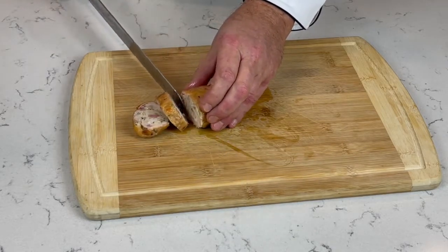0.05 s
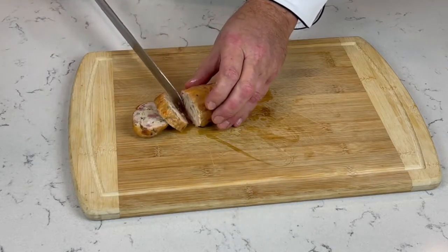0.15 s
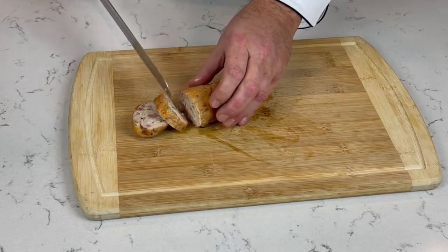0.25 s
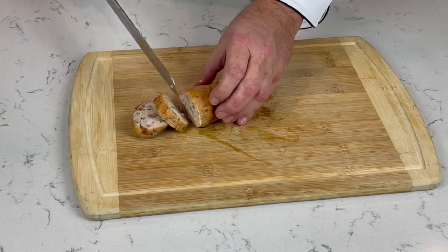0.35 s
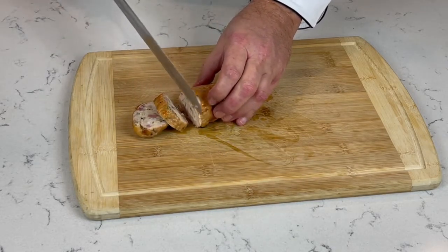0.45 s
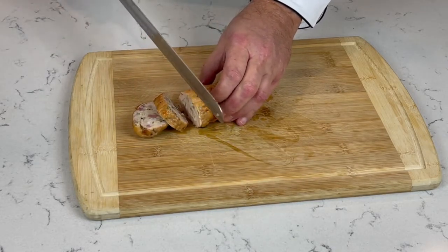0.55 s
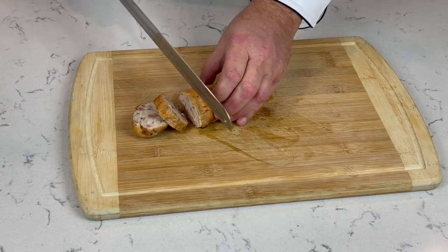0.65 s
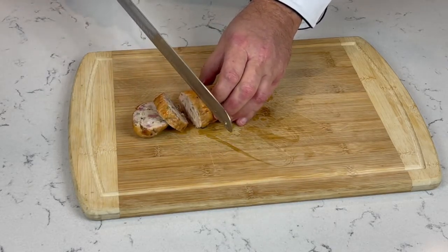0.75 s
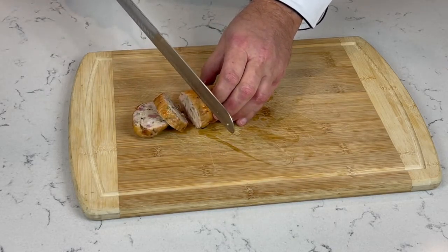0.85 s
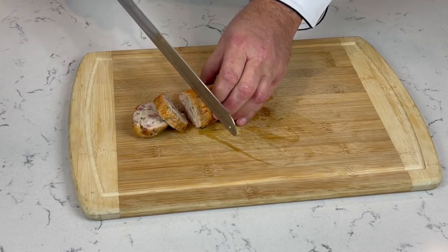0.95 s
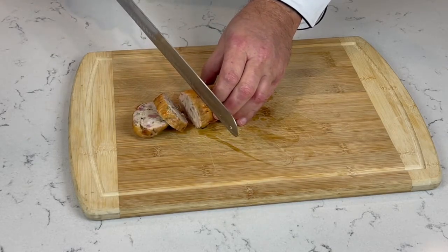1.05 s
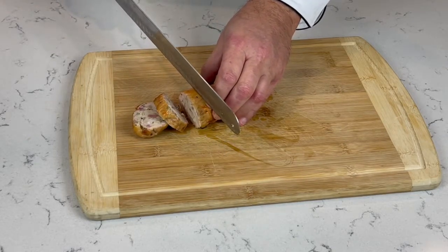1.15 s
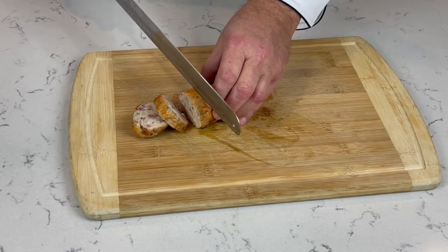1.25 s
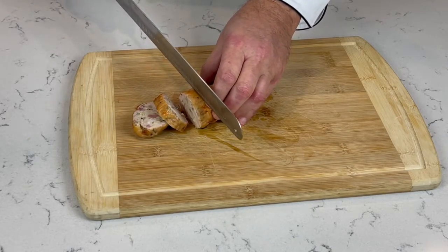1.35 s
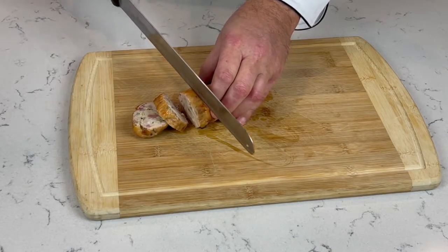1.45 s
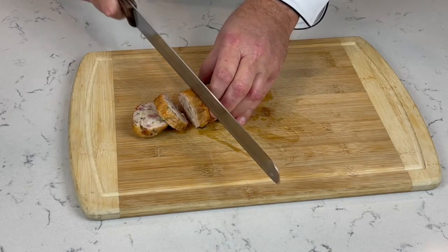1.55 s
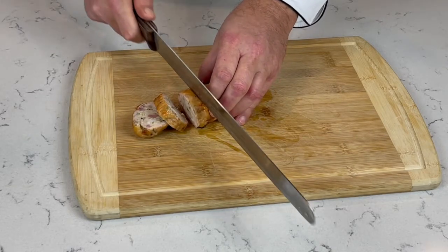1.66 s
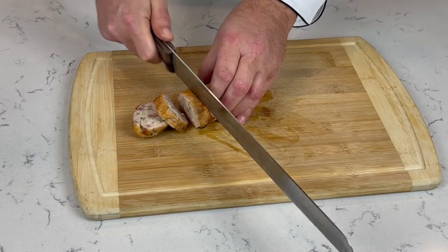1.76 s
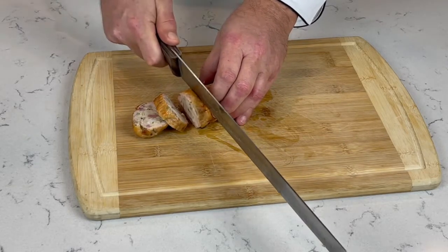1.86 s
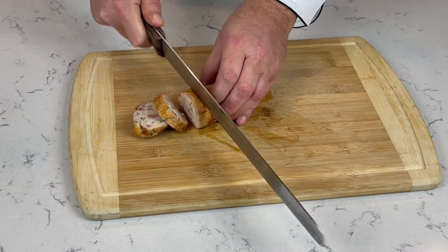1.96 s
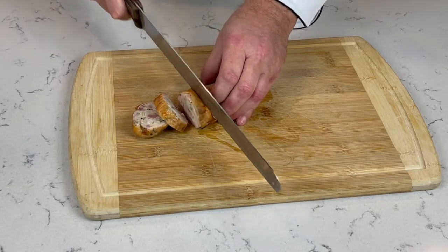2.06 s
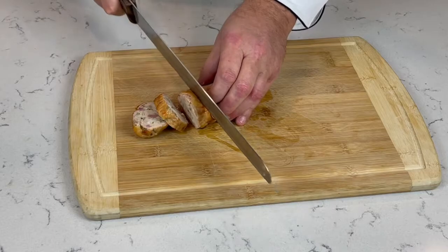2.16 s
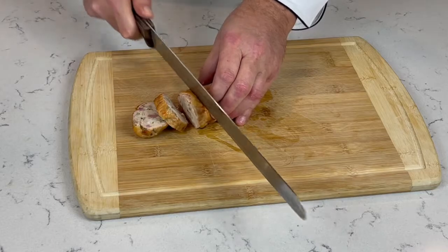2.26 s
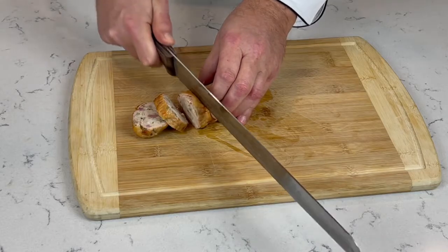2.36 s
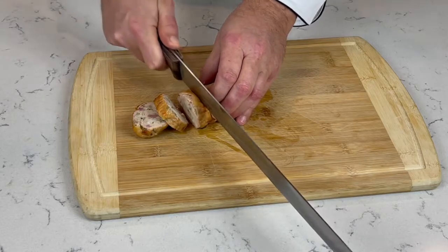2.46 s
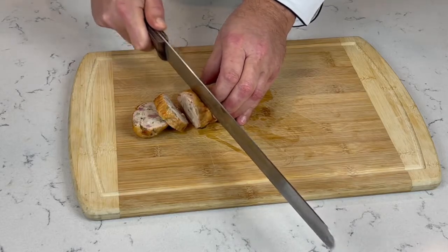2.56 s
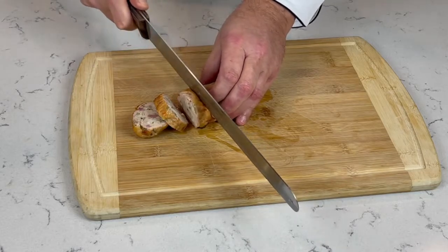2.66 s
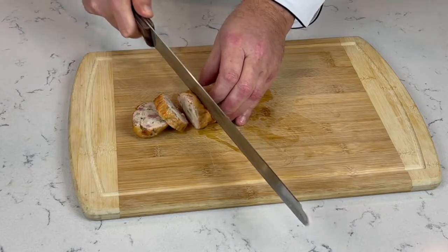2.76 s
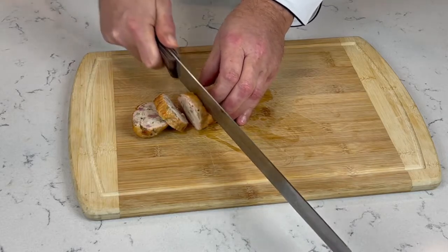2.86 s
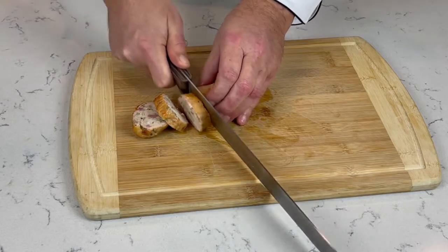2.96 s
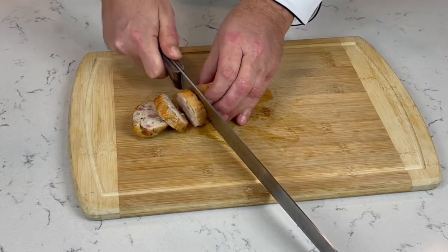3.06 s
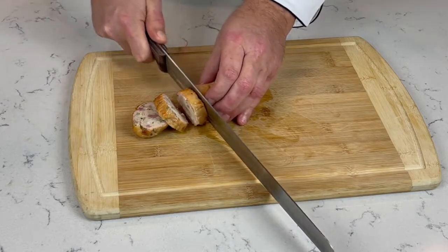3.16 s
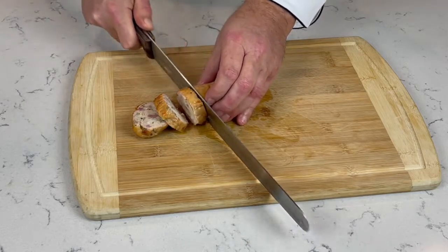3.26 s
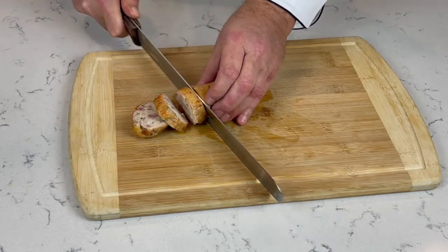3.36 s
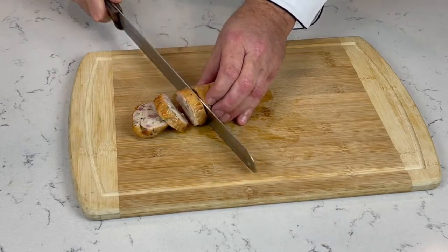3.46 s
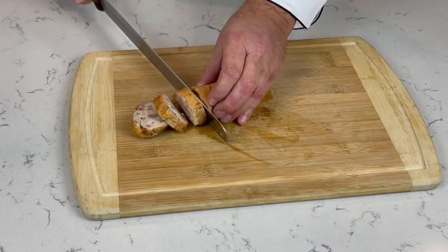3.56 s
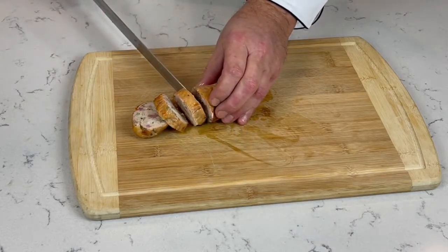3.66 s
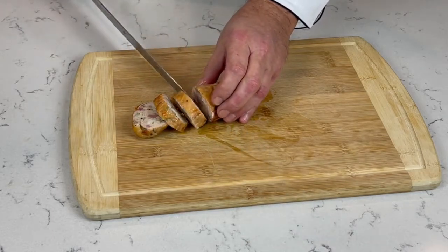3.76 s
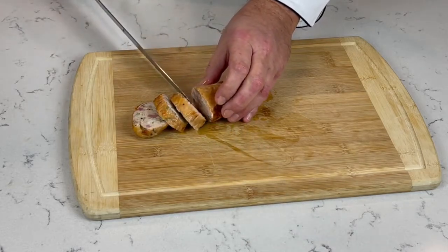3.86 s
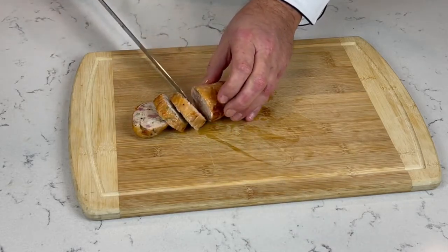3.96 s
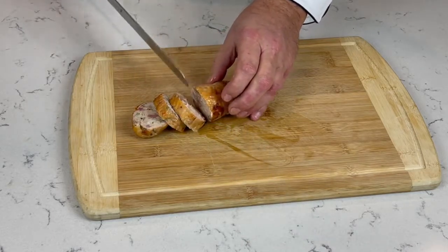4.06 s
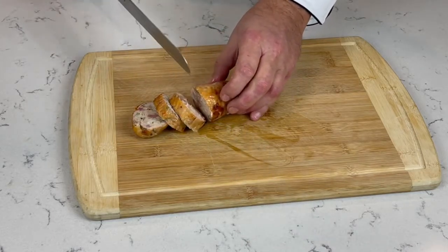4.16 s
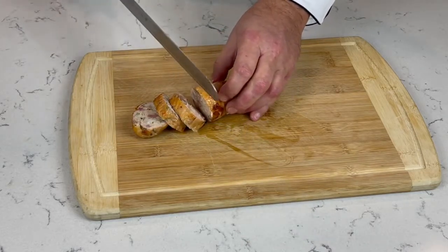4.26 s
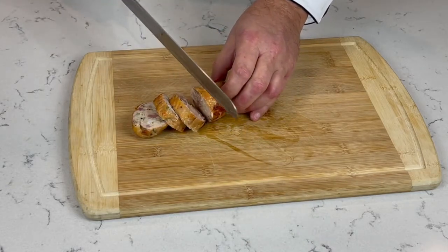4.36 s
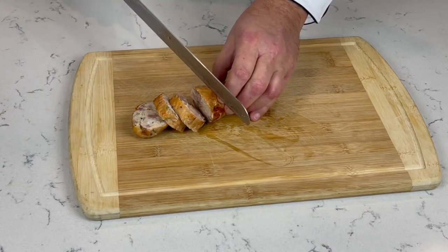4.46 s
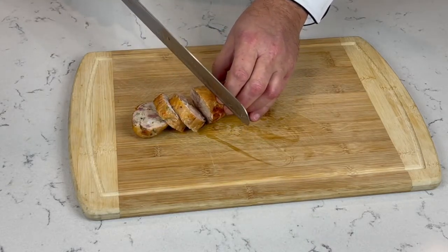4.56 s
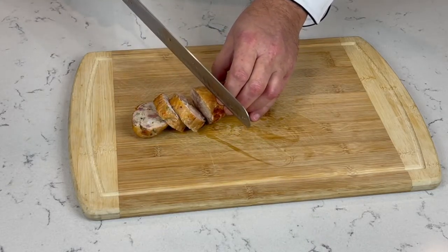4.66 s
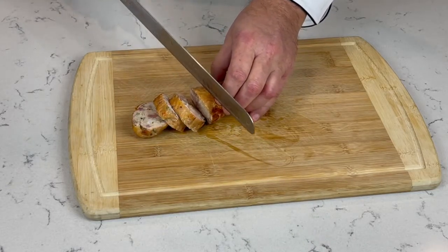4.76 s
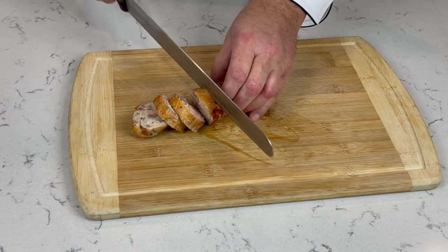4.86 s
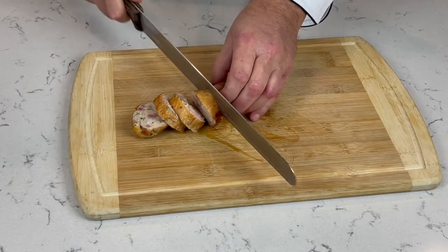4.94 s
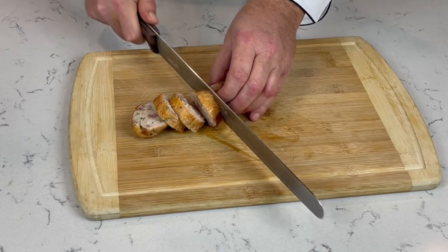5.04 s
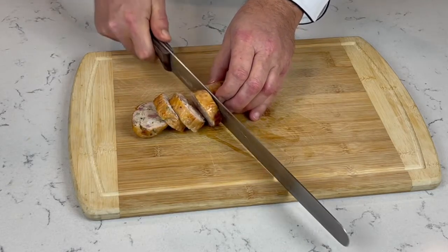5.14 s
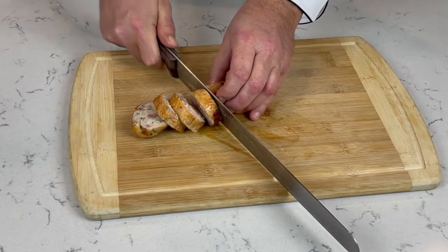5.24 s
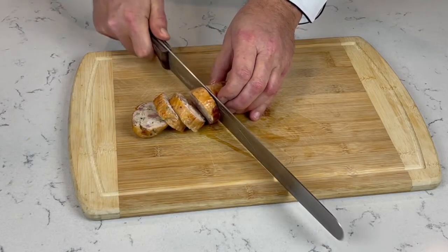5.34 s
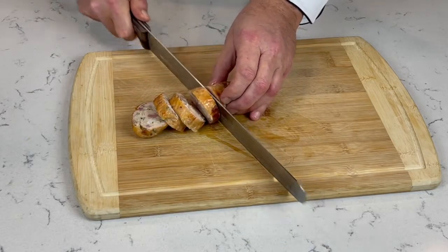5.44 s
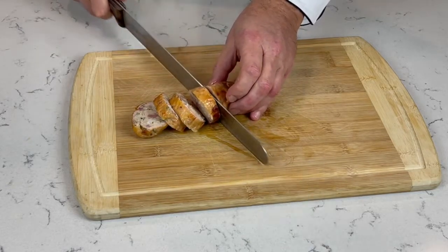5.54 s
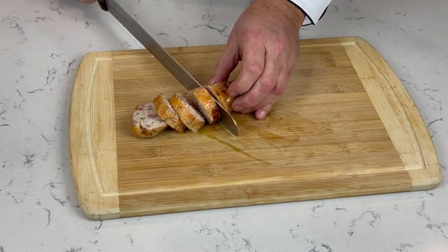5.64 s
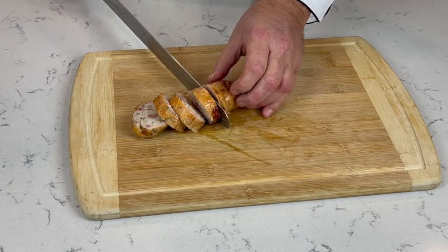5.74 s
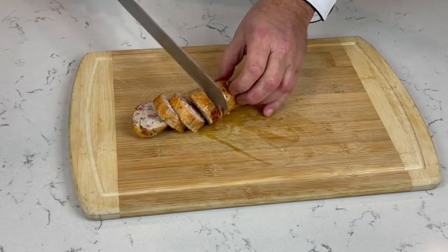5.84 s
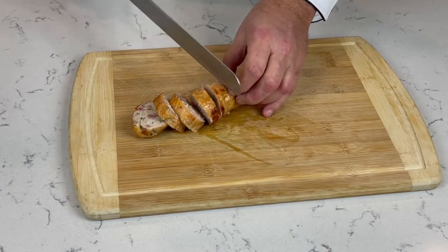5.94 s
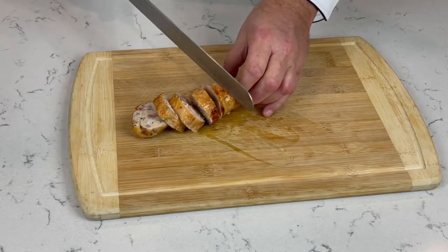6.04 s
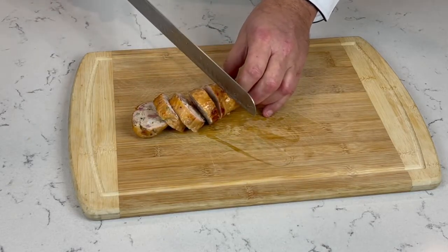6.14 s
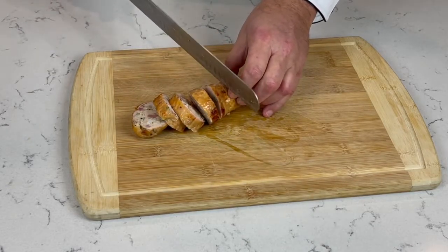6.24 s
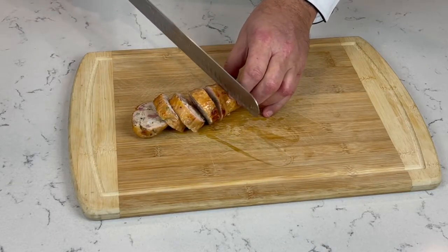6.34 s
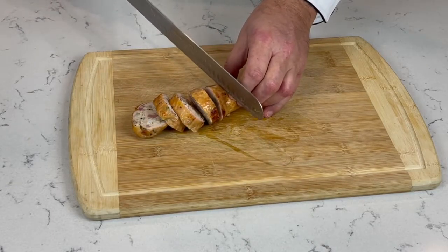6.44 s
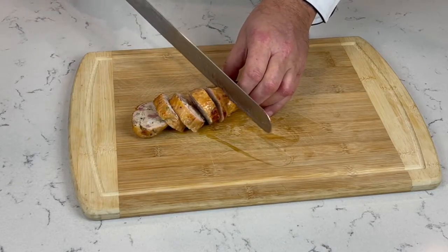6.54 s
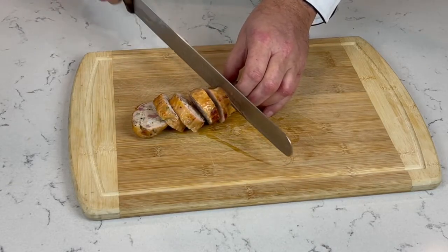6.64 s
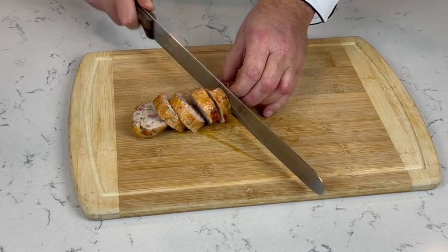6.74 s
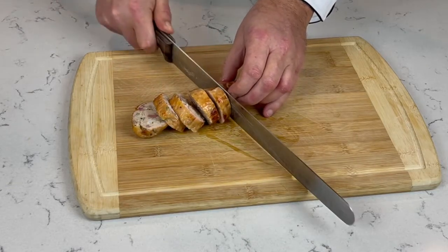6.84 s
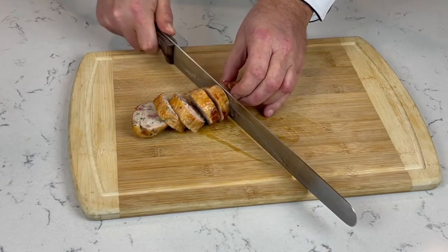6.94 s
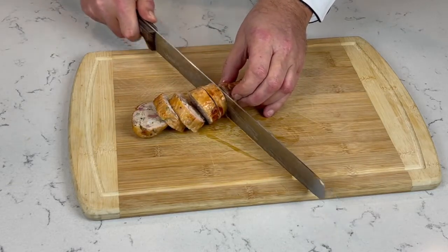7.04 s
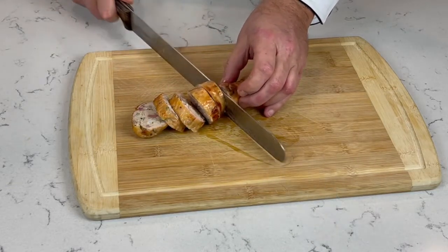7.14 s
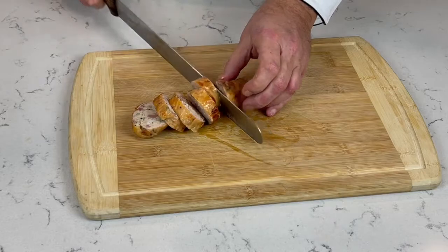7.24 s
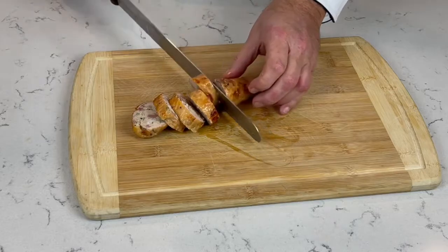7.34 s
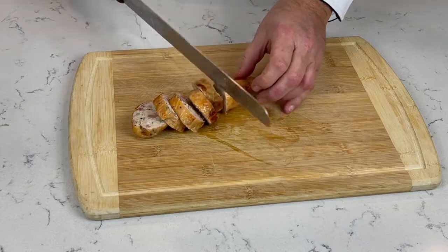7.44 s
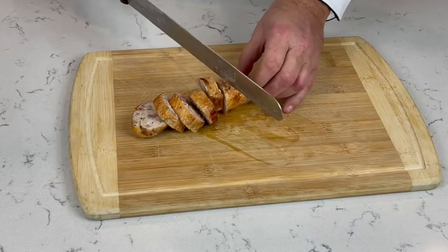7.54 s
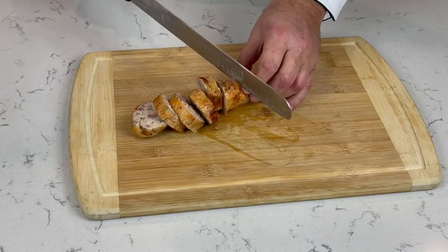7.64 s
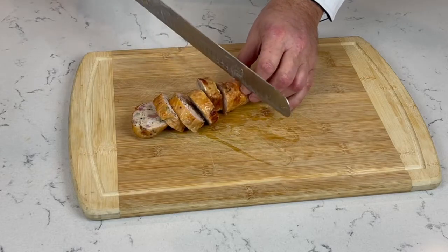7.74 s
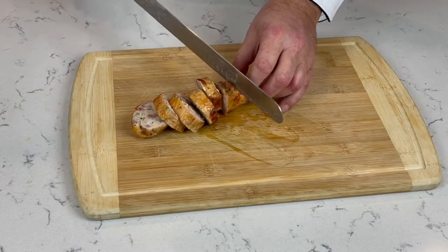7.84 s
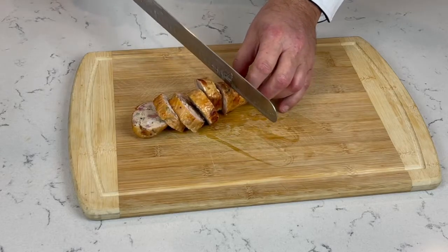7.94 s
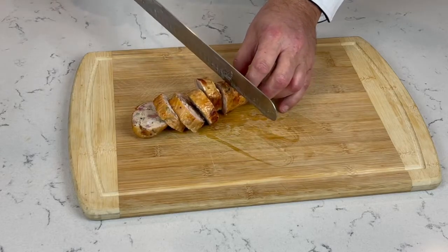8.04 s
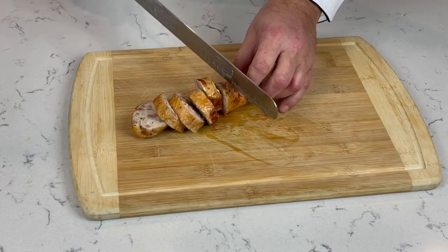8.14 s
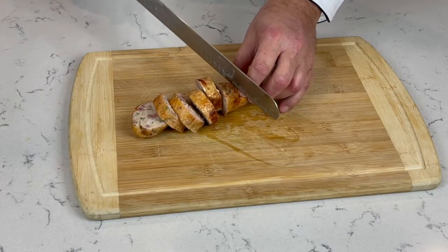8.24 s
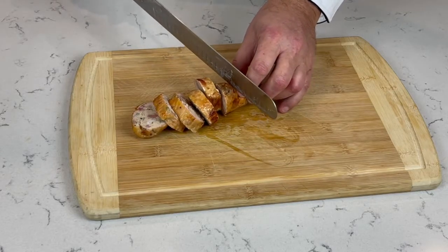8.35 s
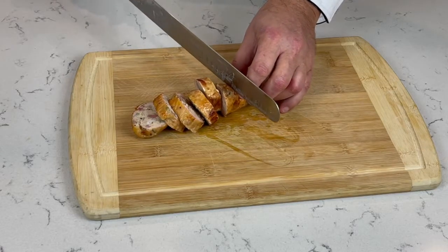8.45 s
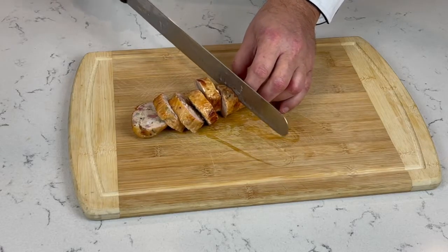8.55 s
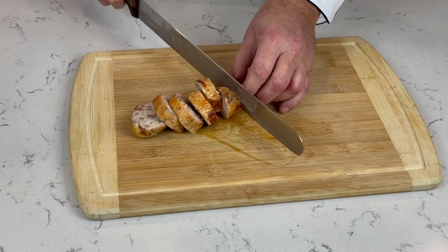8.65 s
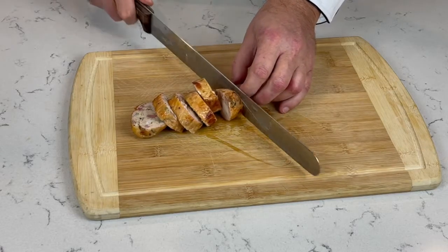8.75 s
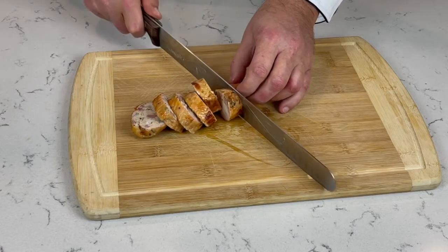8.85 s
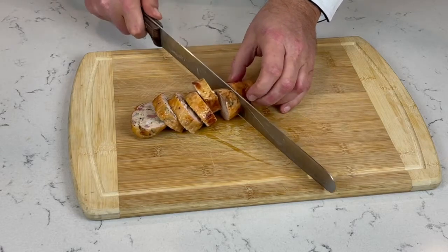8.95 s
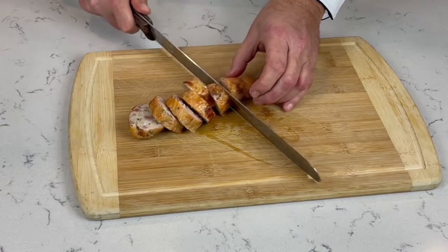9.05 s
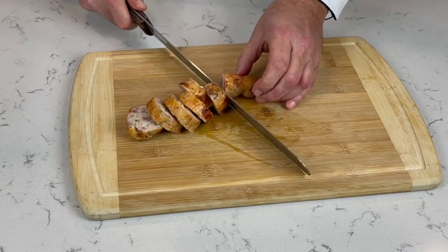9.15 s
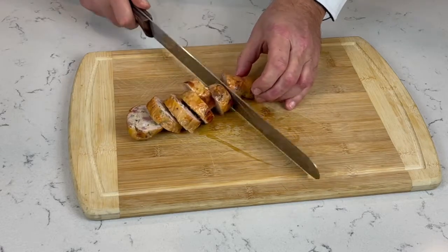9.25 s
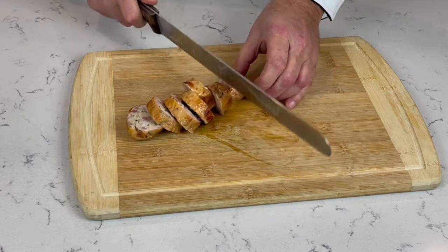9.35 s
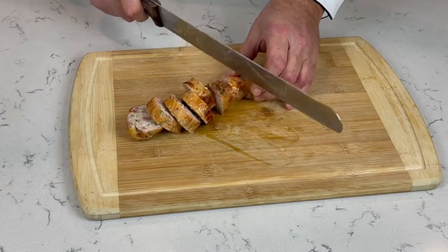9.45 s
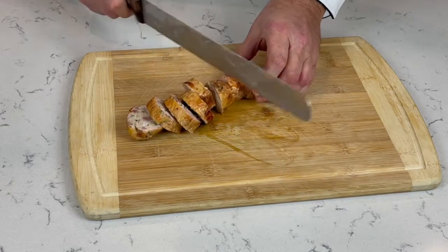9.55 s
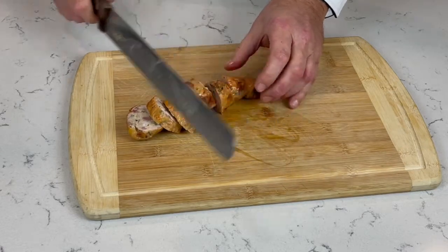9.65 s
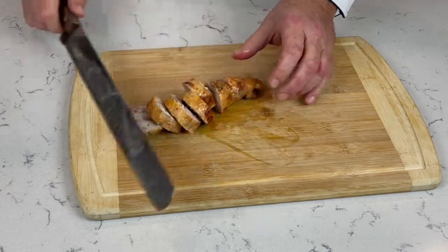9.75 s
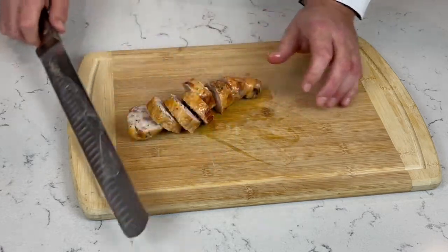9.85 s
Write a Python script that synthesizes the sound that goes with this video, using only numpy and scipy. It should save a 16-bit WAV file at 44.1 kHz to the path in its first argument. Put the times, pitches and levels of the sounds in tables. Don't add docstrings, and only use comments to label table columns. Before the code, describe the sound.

A long knife rasps through roasted meat in sawing strokes, thudding onto a wooden board between slices in a humming kitchen.

```python
import sys
import numpy as np
from scipy import signal
from scipy.fft import rfft, irfft, next_fast_len
from scipy.io import wavfile
from scipy.ndimage import uniform_filter1d

SR = 44100
rng = np.random.default_rng(int(sys.argv[2]) if len(sys.argv) > 2 else 0)


def materialize(psi):
    bounded = np.clip(np.atleast_2d(psi).T, -1, 1)
    quanta = np.round(bounded * 32767).astype(np.int16)
    wavfile.write(sys.argv[1], SR, quanta)


def level_to_linear(level):
    exponent = np.asarray(level, float) / 20
    return 10 ** exponent


N = 436590

# pitch_hz, level_db per Hz
AIR_COLOUR = [(15, -28), (25, -9), (55, -10), (145, -10.5), (168, -2), (204, -9), (332, -5), (478, -12),
              (514, -13), (760, -20), (3530, -48.5), (5090, -38.5), (8500, -33.5), (11000, -77.5),
              (18700, -120)]
# pitch_hz, level_db per Hz
MIC_COLOUR = [(4000, -7.5), (6500, -24.5), (9300, 2), (10500, -1.5), (11500, -15), (12600, -14),
              (13000, -120)]
# pitch_hz, width_hz, level_db
DRONE_HUMS = [(55, 17, -77), (174.1, 8, -72), (280, 8, -98), (336.2, 22, -69), (436, 9.1, -78.5)]
# pitch_hz, left_minus_right_db
ROOM_BALANCE = [(90, .5), (330, -2.5), (770, -2), (1800, 1), (3000, 0)]
# pitch_hz, likeness (0 to 1)
ROOM_LIKENESS = [(60, .9), (160, .86), (270, .7), (450, .3), (740, .05), (1220, .4), (2010, .8),
                 (3330, .75), (5500, .98), (8000, .97), (9800, .999)]
# pitch_hz, time_to_fall_60_db_s
WALL_DECAY = [(60, 1), (160, 0.79), (420, 0.22), (1100, 0.65), (3000, 0.42), (9000, 0.17)]
# late_s, level_db
ECHOES = [(.007, -7), (0.012, -15.5), (.025, -18), (.033, -15.5)]
ROOM_HZ = [62, 104, 124.5, 140, 178.6, 297, 333, 376, 409, 437, 465]
# level_db, time_to_fall_60_db_s
ROOM_RING = [(-8.5, 0.58), (-15, .5), (-10, 0.92), (-15.5, 1), (5.5, 0.42), (2.5, 0.53), (-10.5, 0.34),
             (-10.5, 0.38), (-13.5, 0.35), (-11.5, .35), (-16.5, .3)]

# start_s, level_db, low_notes_db, high_notes_db, rattle_db
CLINKS = [(1.1243, -53.5, -20, -7.5, -2.5), (1.178, -80, -7, 6, 2), (4.3749, -63, -11, 1, -4.5),
          (4.382, -56.5, -6, 3, -9), (4.4952, -62, -6, 1, -8), (4.527, -56.5, -15, 2, -16),
          (4.6708, -86, 0, 0, -22), (6.113, -99.5, 8, 11, 16), (6.184, -69.5, -5, 2, -10),
          (6.2595, -45.5, -7.5, -2, -18), (6.434, -69.5, 1, -15, -12.5), (8.1774, -57, -15.5, -2.5, -3),
          (8.297, -67.5, -10, 2, -6), (9.8914, -52.5, -12.5, -9, -3.5)]
# pitch_hz, level_db, time_to_fall_60_db_s
STEEL_NOTES = [(2660, -15, .15), (2930, -11, 0.22), (3300, -14, 0.12), (5350, -10, 0.15), (5410, -5, 0.24),
               (5480, -7, .2), (5553, -9, 0.12), (5780, -12, 0.12), (7310, -9, 0.1), (7790, -7, 0.15),
               (8300, -12, 0.15), (11200, -24, .08)]
# pitch_hz, level_db per Hz
RATTLE_COLOUR = [(800, -120), (2200, -33), (2700, 5), (3300, 12), (3800, -11.5), (4900, -16), (5500, -3),
                 (6300, -4), (8500, 3.5), (11300, 0), (12300, -64), (13500, -120)]

# start_s, peak_db, bass_db, middle_db, treble_db
KNOCKS = [(0.063, -63, 11, -5, -3), (0.24, -61, 5, -7, -10), (2.967, -14.5, 6.5, -2.5, -14),
          (3.283, -38.5, 5.5, 5, -21), (3.31, -40, 2, 5, 0), (5.17, -23, 0.5, -6.5, -7.5),
          (5.442, -39.5, 2.5, 6, -8), (6.824, -25.5, 1, 3, -4), (6.833, -28, -3, -9, -6.5),
          (7.011, -42, 3, -5, -14), (7.266, -41.5, 6, -8, -14), (7.989, -51, 2, 4, -9),
          (8.824, -18.5, -1.5, 7.5, 8.5)]
# pitch_hz, width_hz, level_db
BOARD_NOTES = [(193, 210, -13), (328.3, 75, 4.5), (455, 140, 1), (585, 45, -4), (687, 30, 1),
               (940, 230, 0.5), (1200, 300, -5), (1720, 254, -10.5), (2060, 200, -8.5), (2650, 250, -20.5),
               (3120, 260, -11), (3900, 180, -20), (4350, 250, -19.5), (5255, 340, -17)]
# start_s, pitch_hz, level_db
LANDING_SPOTS = [(2.967, 800, -5.5), (2.967, 480, 4), (5.17, 473, 6.5), (5.17, 850, -4), (5.17, 2000, -7),
                 (5.17, 140, 18), (6.824, 800, -6), (6.824, 480, 6.5), (8.824, 780, -12.5), (8.824, 430, 9),
                 (8.824, 1150, -1), (8.824, 1500, -3.5), (8.824, 1900, 3), (8.824, 2750, -0.5),
                 (8.824, 65, -12), (2.967, 55, -7)]
SLAB_HZ = [562, 579, 712, 895, 979, 1086, 1187, 1380, 1600, 1826, 1962, 2021, 2312]
# level_db, time_to_fall_60_db_s
SLAB_RING = [(10, 0.11), (11, 0.27), (9, 0.29), (-8, .2), (0, 0.36), (4, 0.22), (5.5, 0.3), (-14.5, .2),
             (-11.5, 0.23), (-15.5, .2), (-7, .25), (-10.5, 0.27), (-9, .2)]

# full_speed_s, held_s, hiss_db, tearing_over_hiss_db, drag_over_hiss_db
FORWARD = [(1.47, 0.084, -61, -36, -41), (1.54, 0.27, -57, -17, -22), (2.286, 0.12, -53, -25, -25.5),
           (2.826, 0.15, -55.5, -24, -24), (4.844, 0.26, -63.5, -13.5, -17.5), (5.1, 0.097, -61, -22, -25),
           (6.574, 0.21, -60, -9.5, -19)]
# full_speed_s, held_s, hiss_db,
# tearing_over_hiss_db, drag_over_hiss_db
BACK = [(.001, 0.044, -71.5, -2, -4.5), (.07, 0.026, -61, -9, -5.5), (.244, 0.0081, -65.5, -17, -27),
        (.29, .2, -73, -25, -19), (1.942, 0.17, -53.5, -25, -23), (2.554, .11, -54.5, -25, -23),
        (5.18, 0.014, -53.5, -16, -28), (5.657, 0.023, -42, -11.5, -19.5), (6.84, 0.008, -49, -17, -20),
        (8.554, .19, -61.5, -9, -17), (8.752, 0.082, -58.5, -8, -19.5), (8.84, 0.059, -54.5, -2.5, -19)]
# full_speed_s, held_s, hiss_db, tearing_over_hiss_db, drag_over_hiss_db
DRAWS = [(3.086, 0.25, -55.5, -9, -6.5), (3.396, 0.085, -45.5, -11, -10), (3.544, 0.15, -43, -7.5, -13),
         (3.95, 0.021, -68, -2, 0.5), (5.3, 0.027, -81, -2, 13), (5.384, 0.032, -54.5, -10.5, -11),
         (5.468, 0.16, -42, -15.5, -17), (5.9, 0.14, -70, -7.5, -13), (6.93, 0.11, -70, 0.5, 8.5),
         (7.14, 0.032, -59.5, -14, -19), (7.33, 0.13, -66, -14, -9), (5.78, 0.043, -63, -20, -4.5),
         (8.95, .03, -72, 11, 12.5), (9.002, 0.049, -57.5, -2, -6.5), (9.09, 0.029, -53.5, -5.5, -6.5),
         (9.2, 0.022, -76.5, -19, 9), (9.31, 0.065, -72, -7, -13)]
# full_speed_s, held_s, hiss_db, tearing_over_hiss_db, drag_over_hiss_db
FLICKS = [(2.888, 0.0082, -62, -2.5, -3.5), (3.544, 0.018, -65, -41, 16), (5.065, 0.0032, -57, -23, -28),
          (5.428, 0.019, -61, -4.5, 7), (7.207, 0.014, -43.5, -11, -18), (7.27, 0.024, -52.5, -6, -15.5),
          (9.235, 0.039, -61, -1.5, -9)]
# full_speed_s, held_s, hiss_db, tearing_over_hiss_db, drag_over_hiss_db
SWINGS = [(7.088, 0.0017, -41.5, -17, -13.5)]
# start_s, held_s, level_db
SHOVES = [(.106, 0.018, -63), (.5, 0.014, -68), (2.93, 0.035, -60.5), (3.03, 0.22, -49), (3.35, 0.022, -81),
          (5.188, 0.31, -53.5), (5.52, 0.099, -52.5), (6.641, .02, -66), (6.85, 0.026, -52.5),
          (7.21, 0.01, -61), (7.29, 0.0094, -57.5), (8.85, 0.033, -53), (9.3, 0.098, -68)]
# rise (dB/s), drift while held (dB/s), fall (dB/s), push on the board over the drag (dB)
FORWARD_MOVE = (190, 6, 200, 7.6)
BACK_MOVE = (483, -9.5, 175, 3)
DRAW_MOVE = (229.5, -10.5, 149, -4)
FLICK_MOVE = (1499.5, -6, 376, -15.5)
SWING_MOVE = (205, -9, 288, -3.5)
SHOVE_MOVE = (370, -26.5, 130)
POCKET_MOVE = (830, -18, 1200)

# pitch_hz, level_db per Hz
HISS_COLOUR = [(1500, -120), (2000, -15.5), (4500, -10.5), (6000, -4), (8500, 1), (10000, 6), (11200, 0),
               (12000, -24), (12700, -26), (12900, -120)]
# pitch_hz, level_db per Hz
TEAR_COLOUR = [(300, -120), (1200, -13), (1900, 0.5), (2600, -1.5), (3500, -1.5), (4500, -5), (6000, -2.5),
               (11000, -120)]
# pitch_hz, level_db per Hz
DRAG_COLOUR = [(100, -120), (500, -21), (900, 5.5), (1300, 2), (1700, 0), (2200, -33.5), (6000, -120)]
# pitch_hz, level_db per Hz
PUSH_COLOUR = [(20, -66), (80, -5), (200, -7), (330, 5), (450, -0.5), (700, -0.5), (1000, -29),
               (4000, -120)]
# pitch_hz, level_db per Hz
SHEEN_COLOUR = [(14300, -120), (14500, 0), (15800, -2), (15940, -120)]
# pitch_hz, width_hz, over_hiss_db
BLADE_NOTES = [(2700, 90, 3), (3570, 80, 5), (4650, 90, 3), (5300, 90, 4), (6650, 100, 3), (8450, 110, 4),
               (8800, 110, 4)]
# start_s, peak_db, pitch_hz
SNAPS = [(0.0283, -39, 9010), (2.9198, -43, 9170), (5.0355, -39, 8460), (5.0534, -45, 9030),
         (6.3734, -57, 8740), (6.8255, -43, 8300), (7.169, -52, 6500), (8.551, -46, 7640),
         (8.742, -35, 8740), (9.8915, -47, 8200)]
# start_s, held_s, level_db, pitch_hz
POCKETS = [(1.42, 0.043, -77, 3200), (1.9, 0.046, -79, 5500), (8.1, 0.017, -61, 450),
           (7.02, 0.017, -52, 435), (3.4, 0.018, -57, 1000), (3.545, .012, -47.5, 1600),
           (3.565, 0.048, -50.5, 1080), (3.585, 0.034, -50.5, 1410), (3.62, 0.022, -59, 930),
           (3.55, .01, -63, 4200), (3.69, 0.018, -62, 2720), (5.43, 0.022, -51, 910),
           (5.66, 0.017, -51, 2800), (5.675, 0.023, -57.5, 2100), (7.05, 0.018, -62, 2680),
           (7.21, 0.015, -56, 2940), (7.23, 0.017, -72, 3700), (7.215, 0.022, -62, 2200)]

# pitch_hz, right_port_lead_radians
NEAR_LEAD = [(300, 0.54), (520, -1.1), (1000, -1.02), (1400, -0.6), (1900, -0.2), (2400, 0), (3400, -0.27),
             (4700, -0.1), (6000, 0)]
# pitch_hz, left_minus_right_db
NEAR_BALANCE = [(100, 0), (300, -1.5), (600, .5), (1300, 2), (2500, 0)]
# pitch_hz, right_port_lead_radians
PORT_LEAD = [(8750, 0), (9300, 1.7), (10200, 3.14), (11030, 4.5), (11700, 6.1), (12500, 6.6), (12900, 5.6),
             (14400, 6.28)]


def unit(x):
    return x / np.sqrt(np.mean(x ** 2) + 1e-20)


def along(points, hz):
    f, values = np.transpose(points)
    return np.interp(np.log(hz + 1), np.log(f + 1), values)


def filtered(x, response):
    n = x.shape[-1]
    m = next_fast_len(n + 8192)
    spectrum = rfft(x, m) * response(np.fft.rfftfreq(m, 1 / SR))
    return irfft(spectrum, m)[..., :n]


def coloured(x, colour):
    return filtered(x, lambda hz: level_to_linear(along(colour, hz)))


def resonances(hz, notes):
    return sum(db / (1 + (2 * (hz - centre) / width) ** 2) for centre, width, db in notes)


def spread(pair):
    def shares(hz):
        turn = np.arccos(np.clip(along(ROOM_LIKENESS, hz), -1, 1)) / 2
        return np.array([np.cos(turn), np.sin(turn)])

    mid, side = filtered(pair, shares)
    return np.array([mid + side, mid - side])


def patchy(patchy_db, channels=1):
    z = signal.stft(rng.standard_normal((channels, N)), nperseg=256)[2]
    field = uniform_filter1d(rng.standard_normal(z.shape[1:]), 5, 0)
    field = uniform_filter1d(field, 12, 1)
    return signal.istft(z * level_to_linear(patchy_db * unit(field)), nperseg=256)[1][:, :N]


def tail():
    hz, t, z = signal.stft(rng.standard_normal((2, SR * 3 // 4)), SR, nperseg=256)
    fade = level_to_linear(-60 * t / along(WALL_DECAY, hz)[:, None])
    walls = spread(signal.istft(z * fade, SR, nperseg=256)[1])
    walls = np.pad(walls, ((0, 0), (round(.004 * SR), 0)))
    return walls / np.linalg.norm(walls[0])


def ringing(modes, seconds, scatter_db):
    t = np.arange(round(seconds * SR)) / SR
    hz, db, t60 = np.transpose(modes)[:, :, None]
    level_db = db + scatter_db * rng.standard_normal(db.shape) - 60 * t / t60
    return level_to_linear(level_db) * np.sin(2 * np.pi * hz * t)


def add(track, s, sound):
    part = track[:, round(s * SR):][:, :sound.shape[-1]]
    part += sound[..., :part.shape[-1]]


def room_tone():
    air = level_to_linear(-64.5) * unit(coloured(patchy(2.34, channels=2), AIR_COLOUR))
    for centre_hz, width_hz, db in DRONE_HUMS:
        noise = rng.standard_normal((2, N))
        air += level_to_linear(db) * unit(filtered(noise, lambda hz: resonances(hz, [(centre_hz, width_hz, 1)])))
    hiss = level_to_linear(-81) * unit(coloured(patchy(0.56, channels=2), MIC_COLOUR))
    sides = np.array([[.5], [-.5]])
    return filtered(spread(air + hiss), lambda hz: level_to_linear(along(ROOM_BALANCE, hz) * sides))


def clinks():
    out, t = np.zeros((2, N)), np.arange(SR // 2) / SR
    hz = np.array(STEEL_NOTES)[:, :1]
    swell_s = np.where((hz > 4000) & (hz < 6300), 0.013, .004)
    for s, db, low_db, high_db, rattle_db in CLINKS:
        def cluster(f):
            return level_to_linear(low_db * (f < 4000) + high_db * (f > 6300))

        rattle = rng.standard_normal(len(t)) * level_to_linear(-60 * t / 0.052) * (1 - np.exp(-t / 0.00057))
        grip = uniform_filter1d(rng.standard_normal((len(hz), len(t))), round(.008 * SR))
        flutter = 1 + .7 * unit(grip)
        notes = ringing(STEEL_NOTES, .5, 3) * flutter * cluster(hz) * (1 - np.exp(-t / swell_s))
        ring = notes.sum(0)
        ring += level_to_linear(rattle_db + 20.5) * filtered(rattle, lambda f: level_to_linear(along(RATTLE_COLOUR, f)) * cluster(f))
        add(out, s - .001, level_to_linear(db - 8.5) * ring)
        add(out, s - .001, level_to_linear(db - 10) * signal.fftconvolve(ring[None], tail(), axes=1))
    return out


def knocks():
    out, blow = np.zeros((2, N)), np.eye(1, SR // 10)[0]
    for s, db, bass_db, middle_db, treble_db in KNOCKS:
        strengths = level_to_linear(np.array(BOARD_NOTES)[:, 2] + rng.standard_normal(len(BOARD_NOTES)))

        def board(f):
            total = 0
            for k, ((centre, width, _), strength) in enumerate(zip(BOARD_NOTES, strengths)):
                sign = (-1) ** min(k, 5)
                total = total + sign * strength * 1j * f * width / (centre ** 2 - f * f + 1j * f * width)
            return total

        def hardness(f):
            spot_db = sum(d * np.exp(-(np.log2((f + 1) / centre) / .17) ** 2)
                          for at, centre, d in LANDING_SPOTS if abs(at - s) < .005)
            contact = [(45, bass_db - 35), (90, bass_db), (200, bass_db), (600, 5.5), (1050, middle_db),
                       (2000, treble_db), (6000, treble_db - 8), (8000, treble_db - 27), (12000, -120)]
            return level_to_linear(spot_db + along(contact, f))

        def late_bass(f):
            return np.exp(-1j * 0.42 * np.sqrt(f) - 2j * np.pi * f * 0.000695)

        wood = filtered(blow, lambda f: board(f) * hardness(f) * late_bass(f))
        wood *= level_to_linear(db) / np.abs(wood).max()
        add(out, s, wood)
        for late_s, echo_db in ECHOES:
            echo = np.convolve(wood, np.hanning(30) / 15)
            add(out, s + late_s, level_to_linear(echo_db + rng.standard_normal((2, 1))) * echo)
        add(out, s, level_to_linear(-5.5) * signal.fftconvolve(wood[None], tail(), axes=1))
        slab = (ringing(np.c_[SLAB_HZ, SLAB_RING], .4, 2.5) * hardness(np.c_[SLAB_HZ])).sum(0)
        add(out, s + 0.002566, level_to_linear(db - 36) * np.convolve(slab, np.hanning(16) / 8))
        room = ringing(np.c_[ROOM_HZ, ROOM_RING], .6, 1).sum(0)
        add(out, s + 0.0026, level_to_linear(db + bass_db - 21) * np.convolve(room, np.hanning(160) / 80))
    return out


def movement_db(t, held_s, db, rise, drift, fall):
    held = drift * np.clip(t, 0, held_s)
    return db + rise * np.minimum(t, 0) + held - fall * np.maximum(t - held_s, 0)


def movement(s, held_s, db, rise, drift, fall):
    t = np.arange(N, dtype=np.float32) / SR - s
    return level_to_linear(2 * movement_db(t, held_s, db, rise, drift, fall))


def stroke_db():
    power = np.full((4, N), level_to_linear(-220))
    kinds = [(FORWARD, FORWARD_MOVE), (BACK, BACK_MOVE), (DRAWS, DRAW_MOVE),
             (FLICKS, FLICK_MOVE), (SWINGS, SWING_MOVE)]
    for strokes, (rise, drift, fall, push_db) in kinds:
        for s, held_s, db, tear_db, drag_db in strokes:
            over_hiss_db = np.array([[0], [tear_db], [drag_db], [drag_db + push_db]])
            power += level_to_linear(2 * over_hiss_db) * movement(s, held_s, db, rise, drift, fall)
    power[3] += sum(movement(*shove, *SHOVE_MOVE) for shove in SHOVES)
    return 10 * np.log10(power)


def sheen(hiss_db):
    level_db = -68.5 + 2.6 * (np.minimum(hiss_db, -45) + 43)
    return level_to_linear(level_db) * unit(coloured(patchy(8)[0], SHEEN_COLOUR))


def pockets():
    out, t = np.zeros((1, N)), np.arange(SR // 4) / SR - .05
    for s, held_s, db, hz in POCKETS:
        width_hz = 0.13 * hz

        def cavity(f):
            return (1j * f * width_hz / (hz * hz - f * f + 1j * f * width_hz)) ** 2

        level_db = movement_db(t, held_s, db, *POCKET_MOVE)
        add(out, s + t[0], level_to_linear(level_db) * unit(filtered(rng.standard_normal(len(t)), cavity)))
    return out[0]


def snaps():
    out = np.zeros((1, N))
    for s, db, hz in SNAPS:
        notes = [(hz, -2, .02), (1.13 * hz, -9, .02), (.78 * hz, -12, .02)]
        add(out, s + .0004, level_to_linear(db) * np.hanning(90) * ringing(notes, 90 / SR, 1).sum(0))
    return out[0]


def saw_blade(levels_db):
    dry = pockets()
    # colour, grit (dB), patches (dB)
    layers = [(HISS_COLOUR, 2.5, 1.5), (TEAR_COLOUR, 4, 3), (DRAG_COLOUR, 4, 2.5), (PUSH_COLOUR, 4, 3.5)]
    for (colour, grit_db, patchy_db), level_db in zip(layers, levels_db):
        catches = uniform_filter1d(rng.standard_normal(N), 40)
        grains = patchy(patchy_db)[0] * level_to_linear(grit_db * unit(catches))
        rubbed = filtered(grains, lambda hz: level_to_linear(along(colour, hz) + resonances(hz, BLADE_NOTES)))
        dry += level_to_linear(level_db) * unit(rubbed)
    dry += snaps()
    return dry + level_to_linear(-8.5) * signal.fftconvolve(dry[None], tail(), axes=1)[:, :N]


def scene():
    half, levels_db = np.array([[-.5], [.5]]), stroke_db()

    def at_ports(hz):
        return level_to_linear(-half * along(NEAR_BALANCE, hz)) * np.exp(1j * half * along(NEAR_LEAD, hz))

    near = filtered(saw_blade(levels_db) + knocks(), at_ports)
    return near + clinks() + room_tone() + sheen(levels_db[0])


def band_limit(x):
    return signal.sosfilt(signal.butter(12, 15940, fs=SR, output="sos"), x)


def record(dry):
    def phone(hz):
        low_cut = (hz * hz / (hz * hz - 46 ** 2 - 1j * hz * 55)) ** 2
        return low_cut * np.exp(1j * along(PORT_LEAD, hz) * np.array([[-.5], [.5]]))

    return band_limit(filtered(dry, phone))


dry = scene()
out = record(dry)
materialize(out)
```